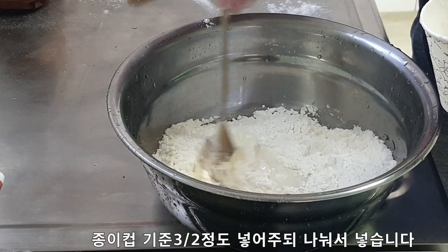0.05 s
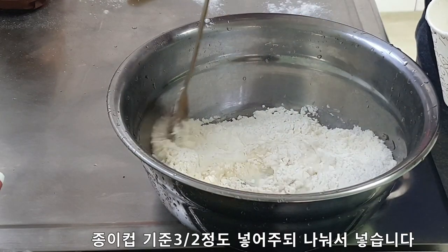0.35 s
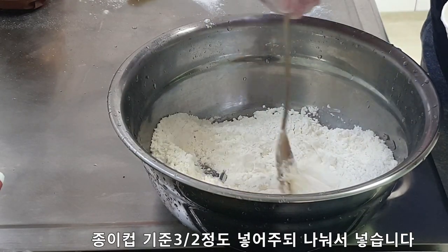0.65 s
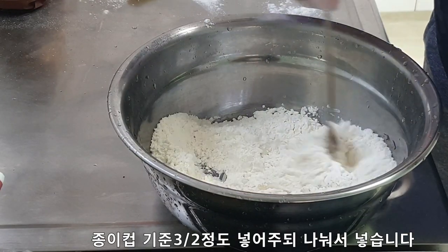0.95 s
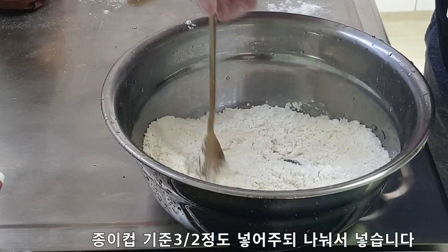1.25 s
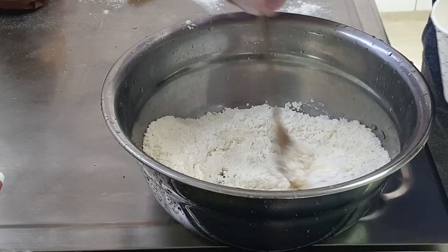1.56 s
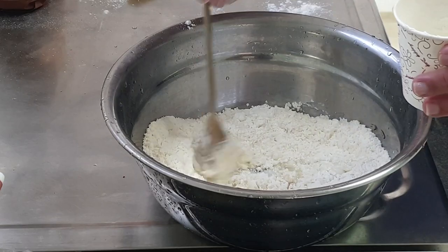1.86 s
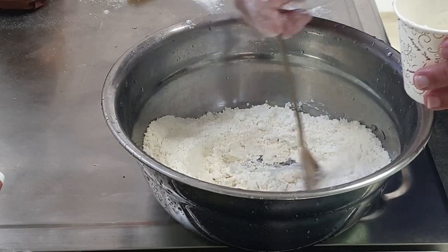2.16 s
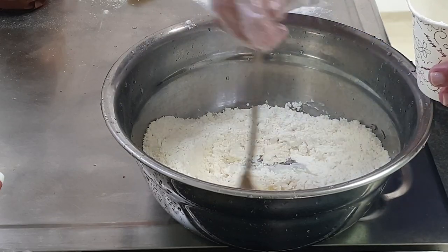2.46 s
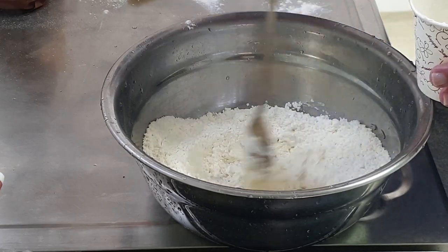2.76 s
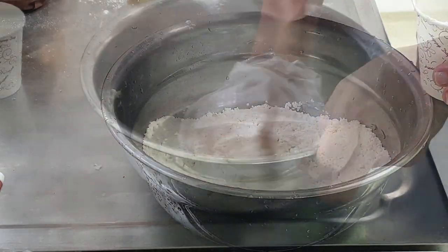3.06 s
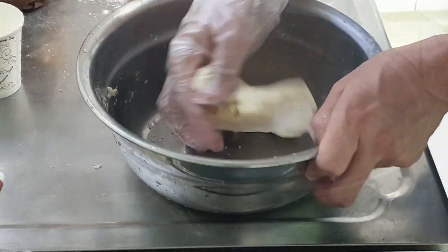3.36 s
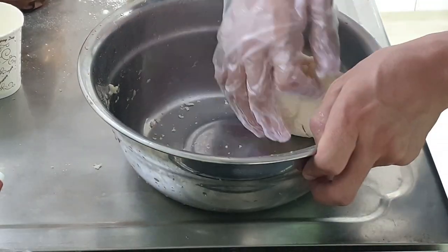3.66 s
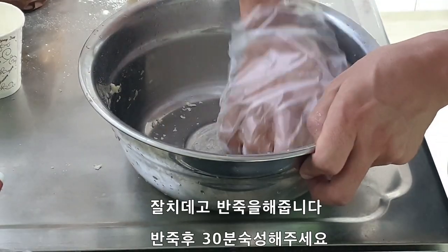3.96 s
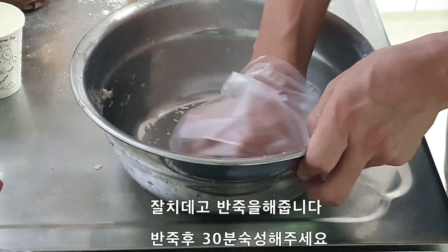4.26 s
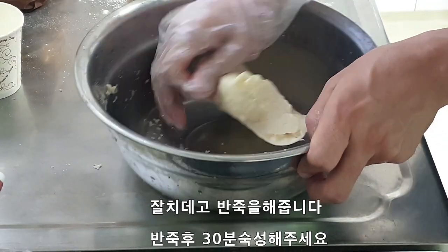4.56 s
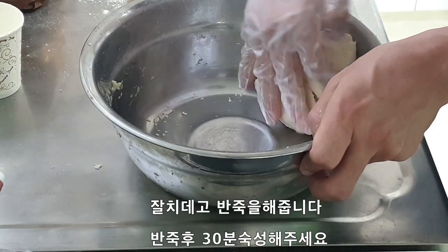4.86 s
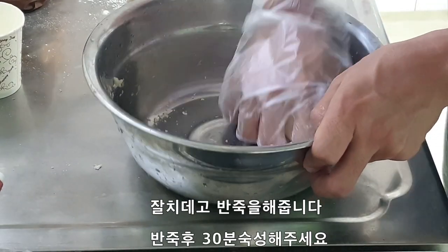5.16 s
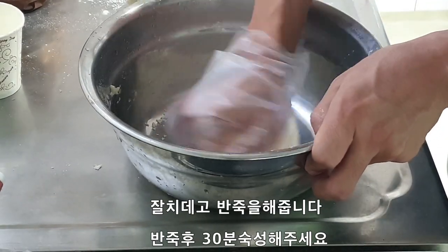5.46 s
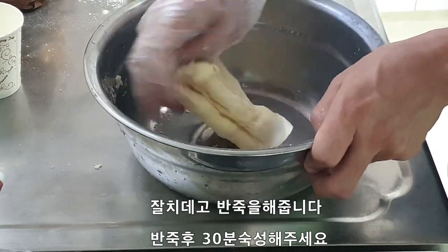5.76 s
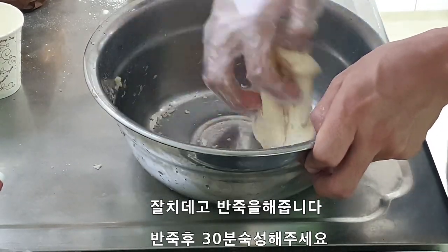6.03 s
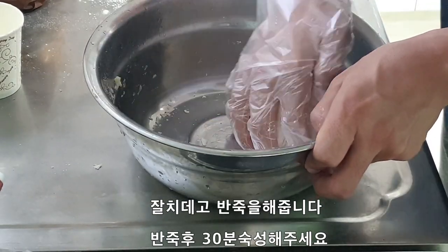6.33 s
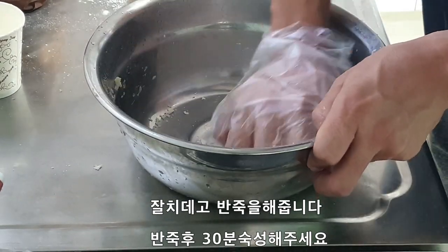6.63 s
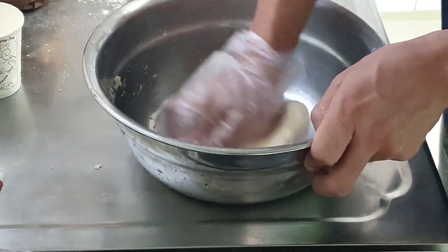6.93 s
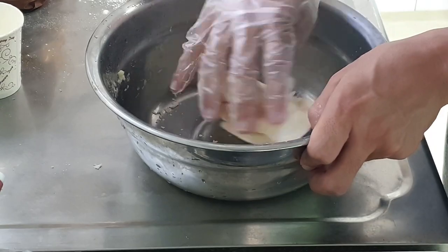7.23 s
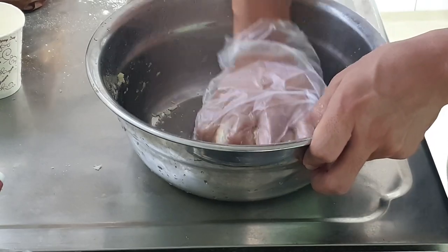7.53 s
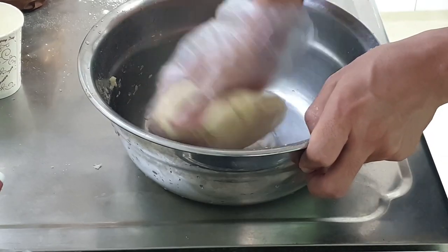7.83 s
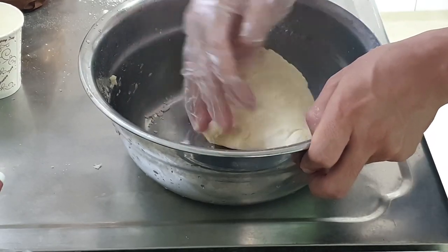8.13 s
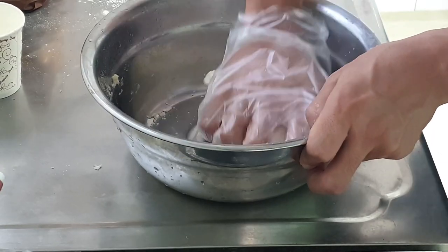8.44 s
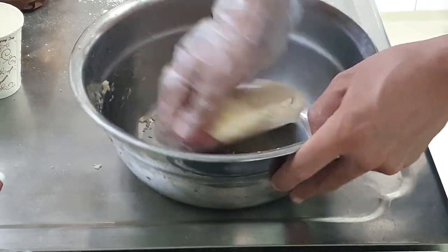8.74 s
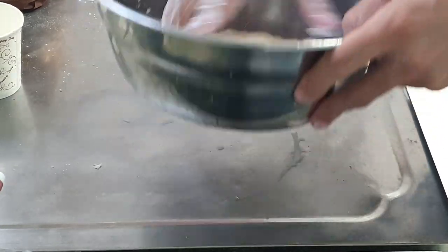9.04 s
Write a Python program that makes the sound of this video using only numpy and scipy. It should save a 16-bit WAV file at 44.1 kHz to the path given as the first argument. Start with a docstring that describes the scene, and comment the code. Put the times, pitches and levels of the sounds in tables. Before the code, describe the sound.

A spoon scrapes through damp flour in short, gritty strokes, lightly tapping a steel bowl. After a split second of silence, a hand in a thin plastic glove kneads dough. The plastic crinkles, snaps and briefly squeaks, while the bowl knocks and clanks on a steel counter that booms softly beneath, loudest near the end. It is heard close up in a small kitchen with a faint appliance drone.

```python
"""Mixing dough in a steel bowl

Close up at a steel counter in a small kitchen, in stereo. A spoon stirs damp flour and taps the bowl.
After a moment of silence a hand in a thin plastic glove kneads the dough: the film crinkles, snaps
and squeaks, the bowl rocks and clanks, and the counter booms under it. An appliance drones behind."""
import sys
import numpy as np
from scipy import signal
from scipy.fft import rfft, irfft, next_fast_len
from scipy.io import wavfile
from scipy.ndimage import uniform_filter1d, map_coordinates

SR = 44100
rng = np.random.default_rng(int(sys.argv[2]) if len(sys.argv) > 2 else 0)


def transcribe(signal):
    """Save signal, clipped to [-1, 1], as a 16-bit WAV file at the path in sys.argv[1]."""
    frames = np.atleast_2d(signal).T
    limited = np.clip(frames, -1, 1)
    pcm = np.round(limited * 32767).astype(np.int16)
    wavfile.write(sys.argv[1], SR, pcm)


N = 401074
TIME = np.arange(N) / SR
STIR_END_S, KNEAD_START_S = 2.545, 2.666
JERKS_PER_S = 35   # flour and film give way unevenly
ROCK_S = 0.04544   # the bowl rocks back this long after a knock


# The hand grips, folds and presses; levels in all tables are relative:
# start_s, length_s, film_db, rub_db, load_db
HAND_MOVES = [(2.66, 0.25, -36, -46, -48), (2.828, 0.17, -34, -45, -42), (3.214, 0.062, -38, -47, -42.5),
              (3.285, 0.2, -36, -45, -37), (3.524, .19, -38, -47.5, -52), (3.895, 0.087, -39.5, -45, -47),
              (3.978, 0.12, -36.5, -43.5, -44), (4.078, 0.048, -35, -44.5, -45),
              (4.197, 0.13, -38.5, -47, -46), (4.413, 0.23, -37, -46, -46), (4.53, 0.16, -33.5, -43.5, -41),
              (4.777, 0.14, -38, -50.5, -51), (4.88, 0.05, -32.5, -44.5, -34),
              (4.983, 0.13, -35.5, -45, -33), (5.143, 0.25, -35.5, -43.5, -36),
              (5.537, 0.25, -37.5, -43.5, -36), (5.623, .23, -35, -44.5, -34), (6.008, 0.18, -35, -47, -52),
              (6.332, 0.38, -36.5, -46.5, -46.5), (6.516, 0.09, -34, -37.5, -40),
              (6.654, 0.2, -33.5, -41.5, -34.5), (6.967, 0.18, -33.5, -42.5, -42),
              (7.14, 0.033, -29.5, -35.5, -35), (7.386, 0.27, -34.5, -41.5, -38),
              (7.577, 0.083, -31.5, -38.5, -41), (7.779, 0.165, -35, -42.5, -43.5),
              (7.933, 0.055, -29, -39.5, -38), (8.093, 0.055, -29.5, -42.5, -36),
              (8.234, 0.094, -31.5, -41.5, -32), (8.307, .25, -30.5, -37.5, -31.5),
              (8.62, 0.23, -36, -42.5, -35.5), (8.73, 0.44, -32, -41.5, -32.5)]
def hand_effort():
    """Levels in dB of the glove's crackle and of its rubbing; it is never quite still."""
    starts, lengths, film_db, rub_db, _ = np.transpose(HAND_MOVES)
    jerk_db = 0.97 * np.tanh(drift(JERKS_PER_S))
    return [jerk_db + swells(starts, lengths, db, attack_s=0.038, fall_db_per_s=62.5, rest_db=rest_db)
            for db, rest_db in ((film_db, -41.5), (rub_db, -51))]


# Plastic film crinkling, heard close: frequency_hz, level_db
FILM_SPECTRUM = [(880, -27.5), (1500, -16.5), (1660, -8.5), (1880, -13), (2060, -6), (2540, -6),
                 (3120, -2.5), (4460, 1), (5830, -1.5), (8740, -1.5), (11100, 3), (15100, 4.5),
                 (16000, -13)]
# The glove rubbing the wall of the bowl: frequency_hz, level_db
RUB_SPECTRUM = [(120, -6), (220, -11), (600, -4), (850, -4), (1000, -1), (1500, -1.5), (2300, 0.5),
                (3500, -2.5), (8000, -49.5)]
def glove():
    """Folds of film buckle thousands of times a second and rub along the bowl."""
    film_db, rub_db = hand_effort()
    crumple_db = film_db + 0.34 * (rub_db - film_db) + 4   # harder rubbing buckles larger folds
    folds = grains(per_s=3000, spread_db=1.5, clump_db=3, clumps_per_s=130, decay_s=0.00047)
    folds = afterglow(folds, t60=0.44, wet_db=4)
    film = two_bands(shaped_noise(folds, FILM_SPECTRUM), crumple_db, film_db + 3, split_hz=6800)
    rubbing = bowl(shaped_noise(folds * from_db(rub_db - 6), RUB_SPECTRUM))
    return flicker(film + rubbing, depth_db=1.3, patch_hz=120, patch_s=0.025) * (TIME > KNEAD_START_S)


# The spoon's strokes through the flour: start_s, length_s, hiss_db, scrape_db, load_db
SPOON_STROKES = [(0, 0.12, -56.5, -58.5, -56), (0.208, 0.085, -59.5, -67.5, -48.5),
                 (.46, 0.069, -51.5, -55, -38), (.56, 0.095, -46.5, -50.5, -35.5),
                 (0.87, 0.091, -55.5, -62.5, -64), (1.001, 0.19, -53, -57.5, -43.5),
                 (1.223, .13, -57, -57.5, -56), (1.462, 0.059, -56, -55.5, -47),
                 (1.543, 0.044, -49, -52, -48), (1.648, 0.084, -60, -63.5, -43.5),
                 (1.766, 0.13, -60, -65.5, -52), (1.903, 0.018, -49, -53.5, -50),
                 (2.024, 0.033, -52, -63, -60), (2.137, .025, -54, -68, -58),
                 (2.169, 0.044, -47, -45.5, -45), (2.27, .14, -47.5, -50, -46),
                 (2.393, 0.16, -44.5, -45.5, -53)]
def spoon_effort():
    """Levels in dB of the spoon's hiss and scrape; crumbs settle faintly between strokes."""
    starts, lengths, hiss_db, scrape_db, _ = np.transpose(SPOON_STROKES)
    jerk_db = 2.3 * np.tanh(drift(JERKS_PER_S))
    return [jerk_db + swells(starts, lengths, db, attack_s=0.005, fall_db_per_s=178, rest_db=-80)
            for db in (hiss_db, scrape_db)]


# Damp flour breaking up, heard close: frequency_hz, level_db
FLOUR_SPECTRUM = [(530, -34), (900, -9), (1340, -10.5), (1530, -5.5), (2040, -1), (2570, -1), (2760, -2),
                  (4460, 2.5), (7580, -1.5), (9650, -6), (10900, -1), (15100, -2), (16000, -5)]
def flour():
    """Crumbs shear and break in front of the spoon."""
    hiss_db, scrape_db = spoon_effort()
    crumbs = grains(per_s=1100, spread_db=0, clump_db=-3, clumps_per_s=230, decay_s=0.0011)
    crumbs = afterglow(crumbs, t60=0.15, wet_db=-1)
    grit = flicker(shaped_noise(crumbs, FLOUR_SPECTRUM), depth_db=2, patch_hz=243, patch_s=0.024)
    return two_bands(grit, scrape_db + 1, hiss_db + 3.5, split_hz=7500) * (TIME < STIR_END_S)


# The spoon taps the bowl and the bowl knocks on the counter:
# start_s, boom_db, thump_db, clank_db, pitch_hz, rattle_s
TAPS_AND_KNOCKS = [(0.089, -52, -52, -37, 1040, .015), (.108, -42, -41, -35, 1650, 0.02),
                   (.462, -40, -33.5, -57, 620, 0.038), (.519, -26.5, -36.5, -60, 500, 0.049),
                   (0.601, -36, -27.5, -50, 593, 0.03), (1.056, -46, -51, -48, 680, 0.078),
                   (1.341, -62, -50, -33, 1400, .016), (1.349, -58, -52, -37.5, 457, .03),
                   (1.466, -59, -44, -47, 430, .04), (1.857, -52, -50, -48, 1210, .014),
                   (2.173, -60, -54, -44.5, 650, 0.04), (2.26, -41, -40, -61, 395, 0.059),
                   (2.296, -32.5, -46.5, -66, 395, 0.12), (3.333, -32, -44, -49, 700, 0.07),
                   (3.503, -23.5, -27, -33, 480, 0.06), (4.598, -32, -40, -35, 605, 0.077),
                   (5.018, -28.5, -33, -37, 443, 0.04), (5.303, -26, -29.5, -31.5, 800, 0.041),
                   (5.652, -24.5, -35, -53, 600, .064), (5.788, -25, -27.5, -34, 660, 0.064),
                   (6.579, -18, -15.5, -20.5, 575, 0.037), (6.601, -42, -23, -25.5, 1000, 0.027),
                   (6.991, -42, -36, -50, 497, 0.023), (7.197, -21.5, -28.5, -34, 500, 0.072),
                   (7.221, -43, -33, -31, 920, 0.029), (7.5, -27, -37, -29, 520, 0.031),
                   (8.083, -18.5, -23, -26.5, 750, 0.06), (8.322, -28, -29, -32, 510, 0.026),
                   (8.342, -19, -21, -38, 454, 0.043), (8.813, -44, -28.5, -37.5, 420, 0.055),
                   (8.862, -14, -13.5, -24.5, 514, 0.073), (8.893, -21, -18.5, -21.5, 950, 0.054),
                   (8.972, -19, -24, -39, 450, 0.1)]
# The dull body of a knock: frequency_hz, level_db
THUMP_SPECTRUM = [(60, -14.5), (130, -0.5), (200, 3.5), (300, -1), (450, -8), (700, -9), (1200, -35.5),
                  (3000, -39)]
# The clank of struck steel: frequency_hz, level_db
CLANK_SPECTRUM = [(150, -7), (400, 5), (1300, 2.5), (1800, -5), (3000, -8.5), (6000, -13), (12000, -32)]
def knocks():
    """Spoon taps bowl and bowl knocks on counter; each knock rattles and clanks at its own pitch."""
    rattle = grains(per_s=900, spread_db=1.5, clump_db=2, clumps_per_s=100, decay_s=0.0036)
    blows = bursts([(start, db - 11, rattle_s) for start, _, db, _, _, rattle_s in TAPS_AND_KNOCKS])
    thump = shaped_noise(rattle * blows, THUMP_SPECTRUM)
    contacts = noise() * rattle
    clank = np.zeros((2, N))
    for start, _, _, clank_db, hz, rattle_s in TAPS_AND_KNOCKS:
        span = slice(int(start * SR), min(int(start * SR) + SR // 2, N))
        progress = np.maximum(TIME[span] - start, 0) / rattle_s
        cushion = 1 - np.exp(-progress / 0.097)   # dough softens the attack
        ring = unit_rms(resonate(contacts[:, span], hz, hz * 1.05))
        clank[:, span] += from_db(clank_db - 6.5) * cushion * np.exp(-progress) * ring
    return bowl(thump + colour(clank, CLANK_SPECTRUM))


# Resonances of the bowl: pitch_hz, width_hz, gain_db
BOWL_MODES = [(191.8, 38, -0.5), (236, 13.4, 7), (312.3, 10.4, 1), (361, 9.1, 1.5), (414.4, 31, 4.5),
              (529, 5.1, 2.5), (640, 8.1, -31), (819, 12, 2), (1014, 20, -1.5), (1120, 13, -2.5),
              (1275, 8.3, -13), (1330, 14, -2.5), (1672, 65, 2), (2330, 43, -9.5)]
def bowl(x):
    """The steel bowl adds its resonances to whatever touches it."""
    return x + sum(from_db(db) * resonate(x, hz, width) for hz, width, db in BOWL_MODES)


# Resonances of the counter top under the bowl: pitch_hz, level_db, t60_s
COUNTER_MODES = [(42, -5, 0.18), (66.4, 2, 0.22), (75.2, 5, 0.48), (100.3, 3, 0.3), (113.5, -1, 0.24),
                 (144, -12, 0.21)]
def counter():
    """Soft blows and the shifting load set the sheet-steel top booming."""
    blows, boom = np.zeros(N), np.zeros(N)
    for start, boom_db, *_ in TAPS_AND_KNOCKS:
        for when, db in ((start, boom_db), (start + ROCK_S, boom_db - 4)):
            blows[min(int(when * SR), N - 1)] += from_db(db)
    for hz, db, t60 in COUNTER_MODES:
        mode = np.sin(2 * np.pi * hz * TIME[:SR]) * from_db(db - 60 * TIME[:SR] / t60)
        boom += signal.oaconvolve(blows, mode)[:N]
    boom = butterworth(boom, [40, 170], "band")   # dough is a soft hammer
    shake = noise()
    rumble = sum((-1) ** k * from_db(db) * resonate(shake, hz, 5.1 / t60)
                 for k, (hz, db, t60) in enumerate(COUNTER_MODES))
    rumble = butterworth(rumble, [38, 160], "band")
    power = uniform_filter1d(np.mean(rumble ** 2, axis=0), size=2200)
    rumble /= np.sqrt(power + 1e-12)   # steady under a steady load
    return from_db(-9) * boom + from_db(-2) * counter_load() * rumble


def counter_load():
    """How hard the counter is shaken: every stroke and move leans on it, every knock jolts it."""
    starts, lengths, _, _, load_db = np.vstack([SPOON_STROKES, HAND_MOVES]).T
    leaning_db = swells(starts, lengths, load_db, attack_s=0.032, fall_db_per_s=59, rest_db=-54.5)
    shudder = bursts([(start + ROCK_S, boom_db - 1, 0.08) for start, boom_db, *_ in TAPS_AND_KNOCKS])
    return np.hypot(from_db(leaning_db), shudder)


# The loudest snaps of crumbs and film: start_s, level_db
LOUD_SNAPS = [(.018, -52), (.463, -46), (.564, -36), (.864, -49), (.922, -40), (1.11, -35), (1.204, -38),
              (1.343, -43), (1.482, -33.5), (1.86, -41), (1.913, -41), (2.0555, -34.5), (2.163, -37),
              (2.179, -26), (2.278, -28.5), (2.509, -23), (3.661, -22.5), (3.724, -26), (3.921, -23.5),
              (4.125, -24), (4.807, -22.5), (5.568, -26), (5.976, -21.5), (6.562, -21), (7.104, -17),
              (7.51, -18), (8.08, -25), (8.236, -20)]
def snaps():
    """Bigger folds and crumbs give way with one bright tick; lesser ones come as the glove works."""
    when, size = rng.random((24, 2)).T
    starts = KNEAD_START_S + when * (TIME[-1] - KNEAD_START_S)
    film_db, _ = hand_effort()
    levels_db = np.interp(starts, TIME, film_db) + 4 + 6 * size
    ticks = bursts([(start, db - 7, 0.0041) for start, db in [*LOUD_SNAPS, *zip(starts, levels_db)]])
    return shaped_noise(afterglow(ticks, t60=0.25, wet_db=-7), FILM_SPECTRUM)


# The glove squeaks inside the bowl: centre_s, pitch_hz, level_db, half_width_s
GLOVE_SQUEAKS = [(2.728, 1430, -46, 0.027), (2.837, 1390, -45, 0.057), (2.95, 1580, -43, 0.043),
                 (6.561, 2270, -30.5, 0.0067), (7.022, 3020, -31, 0.015)]
def squeaks():
    """Film sticks and slips on steel in a rough, narrow band."""
    out = np.zeros((2, N))
    slips = noise() * grains(per_s=710, spread_db=1, clump_db=3, clumps_per_s=150, decay_s=0.0027)
    for centre, hz, db, half_width in GLOVE_SQUEAKS:
        near = np.abs(TIME - centre) < 4 * half_width
        swell = np.exp(-((TIME[near] - centre) / half_width) ** 2 / 2)
        band = resonate(resonate(slips[:, near], hz, hz / 4), hz, hz / 4)
        out[:, near] += from_db(db) * swell * unit_rms(band)
    return out


def kitchen(x, t60, wet_db):
    """Hard walls nearby return a dense tail."""
    age = TIME[:SR]
    tail = noise(SR) * from_db(-60 * age / t60) * (age > 0.006)
    tail /= np.sqrt(np.sum(tail ** 2, axis=1, keepdims=True))
    return x + from_db(wet_db) * signal.oaconvolve(x, tail, axes=-1)[:, :N]


# Room tone of the kitchen: frequency_hz, level_db
AIR_SPECTRUM = [(25, -12), (65, -5.5), (120, -5), (170, -21), (250, -14), (320, -25), (480, -27.5),
                (650, -26.5), (1000, -38), (2300, -35.5), (3000, -48), (5000, -42), (16000, -43)]
# An appliance in the background: pitch_hz, width_hz, level_db
APPLIANCE_BANDS = [(66.3, 5.5, -62), (410.3, 10, -61.5), (525, 2.2, -64), (2240, 210, -71.5)]
def background():
    """Room air and the drone of an appliance, both steady noise."""
    white = noise()
    drone = sum(from_db(db) * unit_rms(resonate(white, hz, width)) for hz, width, db in APPLIANCE_BANDS)
    return shaped_noise(from_db(-56), AIR_SPECTRUM) + drone


# How alike the two sides of the microphone are: frequency_hz, correlation
STEREO_LIKENESS = [(60, 0.97), (200, 0.92), (400, 0.84), (700, 0.4), (1300, 0.31), (2400, 0.32),
                   (4400, 0.25), (8000, 0.043), (15000, 0)]
def noise(size=N):
    """White stereo noise, alike in the bass and unrelated in the treble."""
    padded = next_fast_len(size, True)
    mid, side = rfft(rng.standard_normal((2, padded)))
    alike = at_hz(STEREO_LIKENESS, np.arange(len(mid)) * SR / padded)
    left_right = np.sqrt(1 + alike) * mid + np.sqrt(1 - alike) * side * [[1], [-1]]
    return irfft(left_right, padded)[:, :size]


def from_db(db):
    """Decibels to gain."""
    return 10 ** (np.asarray(db) / 20)


def unit_rms(x):
    """Scale to unit power."""
    return x / np.sqrt(np.mean(x ** 2) + 1e-20)


def at_hz(points, hz):
    """Read a table on a log-frequency axis."""
    frequencies, values = np.transpose(points)
    return np.interp(np.log(hz + 1), np.log(frequencies), values)


def butterworth(x, hz, kind, order=3):
    """Low-, high- or band-pass filter."""
    return signal.sosfilt(signal.butter(order, hz, kind, fs=SR, output="sos"), x)


def colour(x, spectrum, size=4096):
    """Causal (minimum-phase) filter with the given spectrum."""
    gain = from_db(at_hz(spectrum, np.arange(size + 1) * SR / (2 * size)))
    cepstrum = irfft(np.log(gain))
    cepstrum[1:size] *= 2
    cepstrum[size + 1:] = 0
    response = irfft(np.exp(rfft(cepstrum)))[:size]
    return signal.oaconvolve(x, response[None], axes=-1)[:, :N]


def resonate(x, hz, width_hz):
    """One resonance with gain 1 at its peak."""
    radius = np.exp(-np.pi * width_hz / SR)
    poles = [1, -2 * radius * np.cos(2 * np.pi * hz / SR), radius ** 2]
    return signal.lfilter(np.array([1, 0, -1]) * (1 - radius ** 2) / 2, poles, x)


def shaped_noise(envelope, spectrum):
    """Noise of a given colour whose rms follows the envelope."""
    power = np.mean(from_db(at_hz(spectrum, np.linspace(0, SR / 2, 4000))) ** 2)
    return colour(noise() * envelope, spectrum) / np.sqrt(power)


def two_bands(x, low_db, high_db, split_hz):
    """Large folds and crumbs sound below the split and fine ones above, each at its own level."""
    low, high = (unit_rms(butterworth(x, split_hz, kind)) for kind in ("low", "high"))
    return from_db(low_db) * low + from_db(high_db) * high


def drift(per_s):
    """A random wander of unit power."""
    return unit_rms(np.interp(TIME * per_s, np.arange(N), rng.standard_normal(N)))


def grains(per_s, spread_db, clump_db, clumps_per_s, decay_s):
    """Envelope of tiny ticks of uneven but limited size that come in clumps; unit power."""
    size_db = spread_db * np.minimum(rng.exponential(1, N), 4)
    size_db += clump_db * np.tanh(drift(clumps_per_s))
    ticks = from_db(size_db) * (rng.random(N) < per_s / SR)
    power = signal.lfilter([1], [1, -np.exp(-2 / (decay_s * SR))], ticks ** 2 + 1e-12)
    return unit_rms(np.sqrt(power))


def bursts(rows):
    """Envelope of sudden, dying bursts from rows of start_s, level_db, decay_s."""
    power = np.zeros(N)
    for start_s, db, decay_s in rows:
        start = int(np.clip(start_s * SR, 0, N - 1))
        age = TIME[:min(N - start, SR)]
        power[start:start + len(age)] += from_db(db) ** 2 * np.exp(-2 * age / decay_s)
    return np.sqrt(power)


def swells(starts, lengths, levels_db, attack_s, fall_db_per_s, rest_db):
    """Level in dB of a run of gestures: each rises, holds to its end, then falls towards rest."""
    coarse_time = TIME[::40]
    age = coarse_time - starts[:, None]
    fall_db = fall_db_per_s * np.maximum(age - lengths[:, None], 0)
    gains = np.clip(age / attack_s, 0, 1) * from_db(levels_db[:, None] - fall_db)
    loudest = np.maximum(gains.max(axis=0), from_db(rest_db))
    return np.interp(TIME, coarse_time, 20 * np.log10(loudest))


def afterglow(envelope, t60, wet_db):
    """In the treble the room's echoes merge into a smooth tail on each tick."""
    keep = from_db(-120 / (t60 * SR))
    tail_power = signal.lfilter([1 - keep], [1, -keep], envelope ** 2 + 1e-18)
    return np.sqrt(envelope ** 2 + from_db(wet_db) ** 2 * tail_power)


def flicker(x, depth_db, patch_hz, patch_s):
    """Folds and crumbs change shape, so patches of the spectrum swell and fade on their own."""
    hz, times, frames = signal.stft(x, SR, nperseg=512)
    field = rng.standard_normal((400, 1200))
    warped_hz = 4000 * np.log1p(hz / 4000)   # patches widen towards the treble
    grid = np.meshgrid(warped_hz / patch_hz, times / patch_s, indexing="ij")
    gain = from_db(depth_db * unit_rms(map_coordinates(field, grid, order=1, mode="wrap")))
    return signal.istft(frames * unit_rms(gain), SR, nperseg=512)[1][:, :N]


def pan(x, balance):
    """Tilt the sound between left and right, band by band."""
    return np.vstack([colour(x[[channel]], [(hz, side * db / 2) for hz, db in balance])
                      for channel, side in enumerate((1, -1))])


# Balance at the microphone for stirring and for kneading: frequency_hz, left_minus_right_db
STIR_BALANCE = [(60, 2.5), (110, 2.5), (200, 4.5), (380, -4), (700, -0.5), (1290, 4.5), (2380, 7),
                (4400, 4.5), (8120, -5), (15000, -9)]
KNEAD_BALANCE = [(60, 2.5), (110, 2), (200, 2.5), (380, -1.5), (700, 2), (1290, 1), (2380, 2), (4400, 3.5),
                 (8120, -3), (15000, -5.5)]
def scene():
    """Stirring, a moment of complete silence, then kneading."""
    rustle = flour() + glove() + snaps() + squeaks()
    sound = rustle + kitchen(knocks(), t60=0.35, wet_db=-5) + counter() + background()
    stirring = np.clip((STIR_END_S - TIME) / 0.0081 + 1, 0, 1)
    kneading = np.clip((TIME - KNEAD_START_S) / 0.0037, 0, 1)
    return pan(sound, STIR_BALANCE) * stirring + pan(sound, KNEAD_BALANCE) * kneading


def record(dry):
    """The microphone drops the deepest bass; the top is cut steeply at 16 kHz."""
    thinned = butterworth(dry, 33, "high", order=4)
    return signal.sosfilt(signal.ellip(12, 0.1, 80, 16000, fs=SR, output="sos"), thinned)


dry = scene()
out = record(dry)
transcribe(out)
```